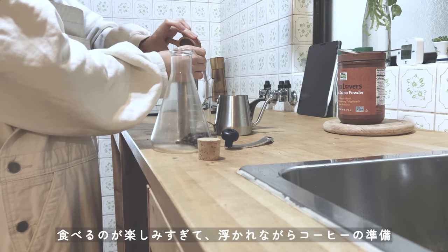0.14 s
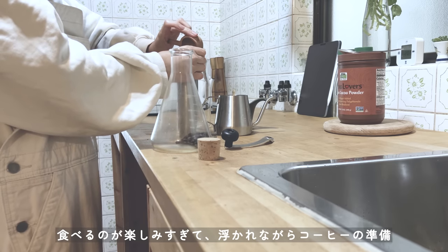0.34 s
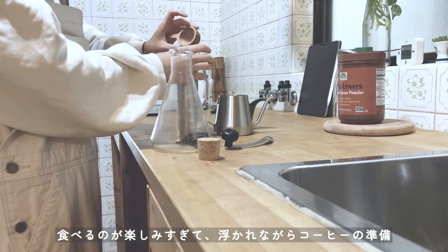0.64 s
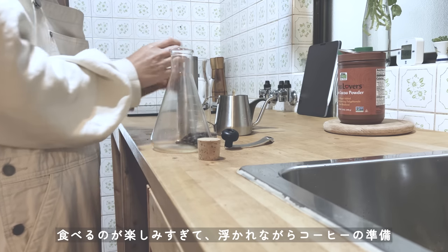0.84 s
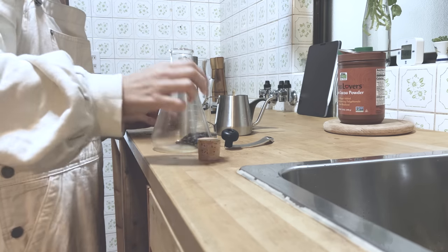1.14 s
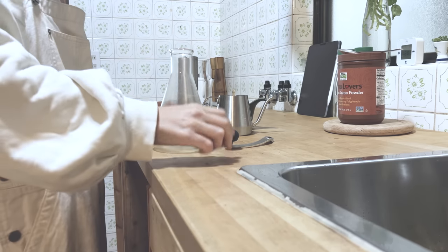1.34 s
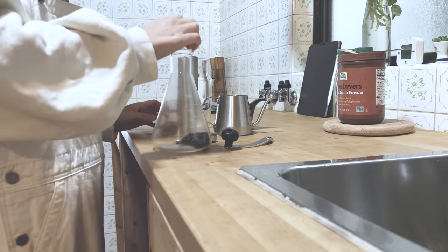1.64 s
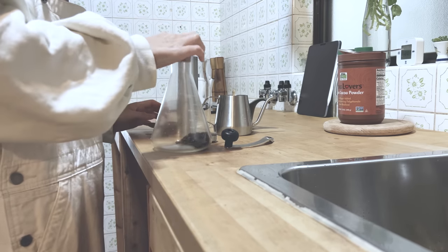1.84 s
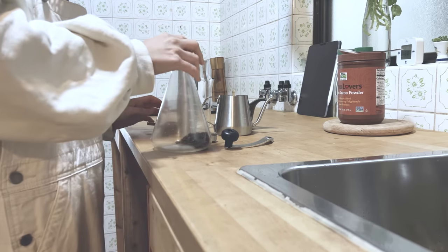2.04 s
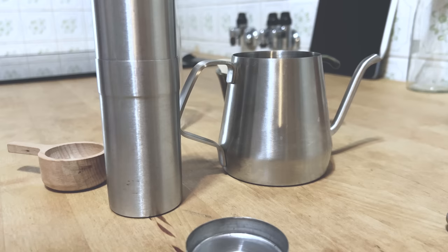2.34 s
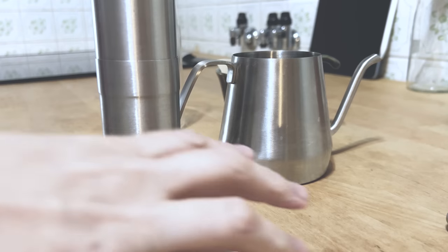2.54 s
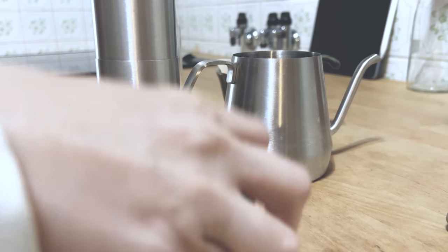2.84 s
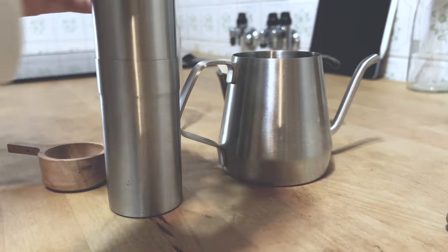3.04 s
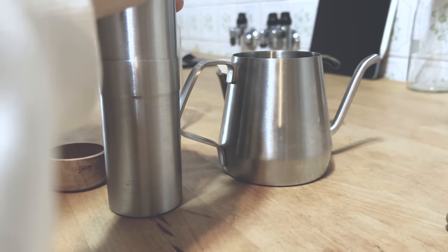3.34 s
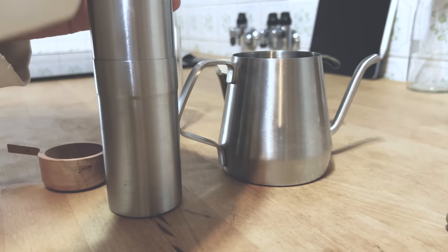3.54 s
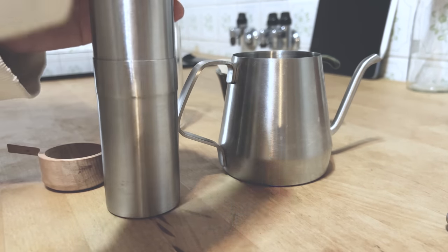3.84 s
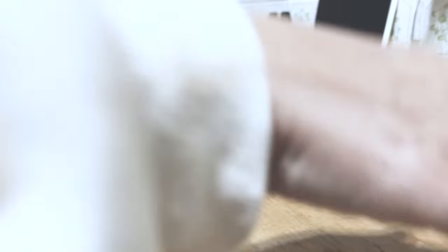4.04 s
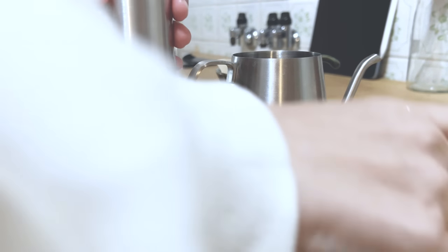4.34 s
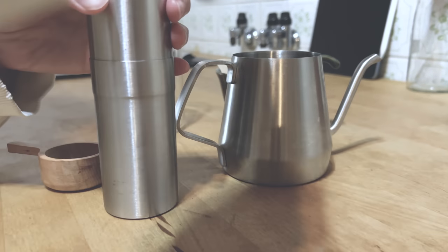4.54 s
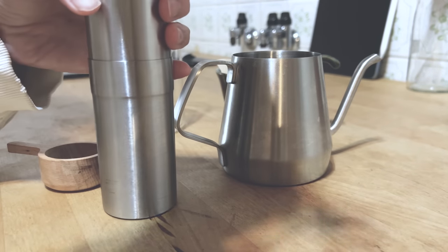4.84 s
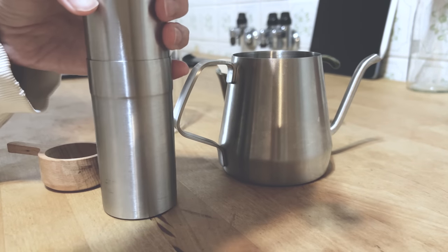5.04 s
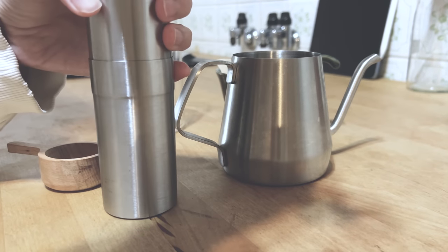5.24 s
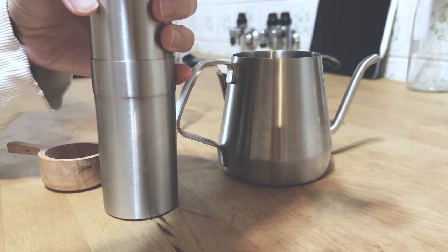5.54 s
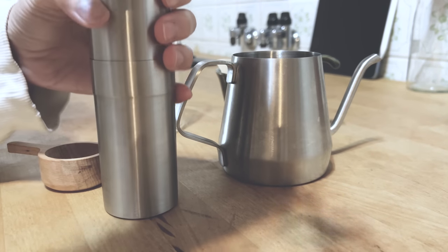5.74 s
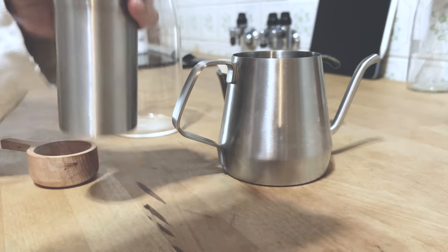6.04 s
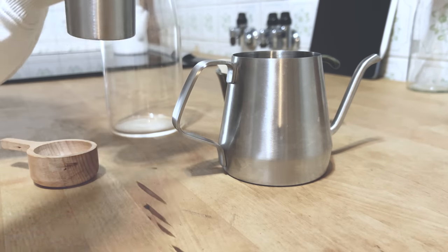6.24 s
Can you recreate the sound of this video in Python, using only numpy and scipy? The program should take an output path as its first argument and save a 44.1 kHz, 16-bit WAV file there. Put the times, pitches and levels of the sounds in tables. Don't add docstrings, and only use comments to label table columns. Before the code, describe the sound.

Coffee grounds hiss into a glass flask, a cork thuds in, then a steel hand grinder is knocked, cranked and sharply lifted off its jar.

```python
import sys
import numpy as np
from scipy import signal
from scipy.fft import rfft, irfft
from scipy.io import wavfile
from scipy.ndimage import map_coordinates

SR = 44100
rng = np.random.default_rng(int(sys.argv[2]) if len(sys.argv) > 2 else 0)


def undo_db(level):
    steps = np.asarray(level, float) / 20
    return 10 ** steps


def inscribe(sig):
    pcm = np.round(np.clip(np.atleast_2d(sig).T, -1, 1) * 32767)
    wavfile.write(sys.argv[1], SR, pcm.astype(np.int16))


N = 282240

# pitch_hz, density_db [dB per Hz]
CRACK = [(700, -10.5), (1500, -4), (3000, -7.5), (5000, -9.5), (7500, -18), (10000, -46)]
# pitch_hz, density_db [dB per Hz]
DULL = [(500, -4.5), (1200, 3), (2800, -10.5), (3800, -25), (5300, -50)]
# pitch_hz, level_db, t60_s
GRIPPED = [(2210, 1, .018), (4300, -7.5, 0.016), (4980, 2, 0.055), (5640, 2.5, 0.044), (6190, -6, 0.026),
           (8850, -13.5, 0.043)]


def unit(x):
    return x / np.sqrt(np.mean(x ** 2) + 1e-20)


def along(points, hz):
    f, v = np.transpose(points)
    return np.interp(np.log(hz + 1), np.log(f + 1), v)


def pan(pan_db):
    return undo_db([[pan_db / 2], [-pan_db / 2]])


def coloured(x, points):
    shape = undo_db(along(points, np.fft.rfftfreq(4096, 1 / SR)))
    cepstrum = irfft(np.log(shape + 1e-6))
    cepstrum[1:2048] *= 2
    cepstrum[2049:] = 0
    kernel = unit(irfft(np.exp(rfft(cepstrum)))) / 64
    return signal.fftconvolve(x, kernel[None], axes=1)[:, :x.shape[1]]


def wobble(rate):
    knots = rng.standard_normal((2, int(N * rate / SR) + 4))
    return np.array([map_coordinates(k, [np.arange(N) * rate / SR]) for k in knots])


def rush(points, alike, pan_db, grain_db, rate):
    a, b = rng.standard_normal((2, N))
    turn = np.arccos(np.clip(alike, 0, 1)) / 2
    pair = np.array([np.cos(turn) * a + np.sin(turn) * b, np.cos(turn) * a - np.sin(turn) * b])
    grains = undo_db(grain_db * wobble(rate)[0])
    return unit(coloured(pair * grains, points)) * pan(pan_db)


def levels(rows):
    s, *cols = np.transpose(rows)
    return [undo_db(np.interp(np.arange(N) / SR, s, db, left=-120, right=-120)) for db in cols]


def gestures(rows, rest_db, rise, fall):
    # start_s, level_db
    stillness = [
        (0, 2.5),
        (2.3, 3.5),
        (4.7, 2),
        (5.1, -2),
        (5.6, 0),
        (6.4, 4),
    ]
    t = np.arange(N) / SR
    swells = []
    for s, hold, db in rows:
        swells.append(undo_db(db - rise * np.maximum(s - t, 0) - fall * np.maximum(t - s - hold, 0)))
    return np.maximum(np.max(swells, axis=0), undo_db(rest_db) * levels(stillness)[0])


def ringing(modes, t, spread, blur, rise):
    hz, db, t60 = np.transpose(modes)[:, :, None]
    chance = rng.standard_normal((3, len(modes), 1))
    side = np.array([1, -1])[:, None, None]
    level = undo_db(db + 2 * chance[0] - 60 * t / t60)
    knots = rng.standard_normal((2, len(modes), 400))
    step, part = np.divmod(t * np.clip(blur * hz, 1, 1000), 1)
    before, after = [np.take_along_axis(knots, step[None].astype(int) + k, axis=2) for k in (0, 1)]
    drift = before * (1 - part) + after * part
    flutter = np.exp(-t / 0.0043) + (1 - np.exp(-t / 0.02)) * (0.26 + drift[0] + 1j * drift[1])
    phase = 2 * np.pi * hz * t + 2 * chance[2] + spread * side * chance[1]
    waves = (flutter * np.exp(1j * phase)).imag
    return (level * waves).sum(axis=1) * (1 - np.exp(-t / rise)) ** 2


def struck(contacts, modes, colour, edge_db, pan_db, crack_t60, blur, rise):
    # pitch_hz, level_db, t60_s
    counter = [(230.7, -14, 0.17), (337.7, 3.5, 0.059), (400.6, 0, 0.062), (509, 8.5, 0.025),
               (649.6, 3.5, 0.037), (724, 0, 0.038), (864.6, -13.5, 0.096), (1048.6, -5, 0.055)]
    # pitch_hz, density_db [dB per Hz]
    edge_colour = [(5000, -16.5), (7500, 14.5), (9000, 6), (13000, 10), (15700, 3), (16300, -21)]
    crack, edge, tones = np.zeros((3, 2, N + SR))
    t = np.arange(SR // 3) / SR
    for s, db, knock_db, ring_db in contacts:
        at = slice(round(s * SR), round(s * SR) + len(t))
        gain = undo_db(db) * pan(pan_db)
        noise = rng.standard_normal((2, 3, len(t)))
        shared_and_own = 0.31 * noise[:, :1] + 0.5 * noise[:, 1:]
        bursts = shared_and_own * undo_db(-60 * t / crack_t60) * (1 - np.exp(-t / rise)) ** 2
        crack[:, at] += gain * undo_db(2.5) * bursts[0]
        edge[:, at] += gain * undo_db(edge_db + 7.5) * bursts[1]
        knock_gain = undo_db(db + knock_db + 1.5) * pan(-2.4)
        tones[:, at] += knock_gain * ringing(counter, t, spread=0.25, blur=0.14, rise=rise + 0.0015)
        tones[:, at] += gain * undo_db(ring_db + 1.0) * ringing(modes, t, spread=0.82, blur=blur, rise=rise)
    return (coloured(crack, colour) + coloured(edge, edge_colour) + tones)[:, :N]


def hum():
    # pitch_hz, level_db [rms]
    partials = [(156, -64), (416, -67), (230.5, -72.5)]
    t = np.arange(N) / SR
    tones = 0
    for hz, db in partials:
        tones = tones + undo_db(db + 3 + 3 * wobble(9.07)[0]) * np.sin(2 * np.pi * hz * t)
    return tones * (t < 2.36)


def pouring():
    # start_s, level_db
    pour = [
        (0.0, -35.5),
        (0.308, -42.5),
        (0.52, -75.5),
    ]
    # pitch_hz, density_db [dB per Hz]
    grounds = [(880, -32), (2240, -4), (3600, -15), (4150, -3.5), (5790, -2.5), (11000, -3.5), (14300, -35),
               (22000, -120)]
    return levels(pour)[0] * rush(grounds, alike=0.16, pan_db=3.0, grain_db=1.5, rate=110)


def hands():
    # start_s, level_db
    weight = [(0, -50.5), (1.15, -54.5), (1.92, -45.5), (2.1, -52.5), (2.33, -55), (2.38, -74), (2.66, -67),
              (2.8, -54.5), (3.2, -59.5), (3.4, -45.5), (3.7, -50.5), (4.0, -57.5), (4.32, -47.5),
              (4.55, -55.5), (5.3, -52.5), (5.6, -44.5), (6.0, -51), (6.4, -64)]
    # start_s, hold_s, level_db
    rubs = [(0, 0.29, -55.5), (.87, 0.087, -56.5), (1.345, 0.0049, -59), (2.37, .2, -53),
            (2.77, 0.059, -53), (2.88, 0.28, -60), (3.36, 0.089, -55), (3.58, 0.03, -62), (4.05, 0.21, -61),
            (4.29, 0.045, -54), (4.5, 0.003, -62), (4.62, 0.14, -60), (4.9, 0.066, -47.5),
            (5.63, 0.062, -52), (5.87, .55, -53.5)]
    # pitch_hz, density_db [dB per Hz]
    rumble_colour = [(18, -47.5), (30, -34), (47, -3), (70, -1), (102, -5), (190, -15.5), (250, -40.5),
                     (420, -120)]
    shuffle_colour = [(76, -32), (130, -11), (233, -3), (426, -1.5), (507, -5.5), (2500, -29.5),
                      (3250, -51), (5500, -120)]
    rub_colour = [(530, -5.5), (900, -3), (1500, -5), (3540, -13), (8870, -16.5), (9800, -18),
                  (12700, -39.5), (21600, -120)]
    rumble, = levels(weight)
    shuffle = undo_db(-56) * (rumble / np.median(rumble)) ** 0.5
    rubbing = gestures(rubs, rest_db=-72.5, rise=183, fall=102)
    return (rumble * rush(rumble_colour, alike=0.89, pan_db=-3, grain_db=2.2, rate=19)
            + shuffle * rush(shuffle_colour, alike=0.41, pan_db=-1.0, grain_db=2.5, rate=31)
            + rubbing * rush(rub_colour, alike=0.037, pan_db=5, grain_db=0.5, rate=180))


def sleeves():
    # start_s, hold_s, level_db
    swishes = [(0, .3, -37), (.8, 0.19, -67), (1.345, 0.0077, -59), (1.68, 0.04, -59.5), (2.4, 0.56, -67.5),
               (3.33, .02, -53), (3.58, 0.045, -64.5), (3.83, 0.047, -57), (4.07, 0.18, -68),
               (4.22, .17, -63), (4.62, .01, -58), (5.44, 0.036, -68), (5.67, .1, -52.5),
               (5.75, 0.045, -48), (5.9, .4, -66), (6.38, .03, -59)]
    # pitch_hz, density_db [dB per Hz]
    cloth = [(3000, -26), (5000, -15.5), (9500, -12.5), (10200, -8), (11100, -13), (11600, -3.5),
             (15500, -6), (16100, -41)]
    moving = gestures(swishes, rest_db=-76.5, rise=400, fall=390)
    return moving * rush(cloth, alike=0.42, pan_db=0.0, grain_db=2.0, rate=240)


def board():
    # start_s, crack_db, knock_db, ring_db
    landing = [
        (1.1975, -44, -10, -10),
        (1.2068, -24.5, -10, 1.5),
        (1.2214, -34, -12, 1),
        (1.2444, -32.5, -8, -9),
    ]
    rebound = [
        (1.2768, -19, -14, -10.5),
        (1.2837, -22.5, -12, -15),
    ]
    # pitch_hz, level_db, t60_s
    slab = [(436, -6, 0.069), (559, 1, 0.088), (740, 3, .045), (1065, 1, .08), (1378, -4, .08),
            (1790, 2, 0.085), (2116, 1, .04), (2353, -14, .06), (2750, -14, 0.055), (3200, -17, 0.041)]
    # pitch_hz, density_db [dB per Hz]
    open_colour = [(500, -3), (1200, 5), (2200, 1), (3300, -10), (3800, -28), (5000, -33), (5600, -47)]
    firm = [(500, -4), (1500, 4), (4000, -10), (5000, -26), (7500, -42)]
    wood_and_glass = [(1095, 3, 0.058), (1780, -1, .05), (4040, -16, 0.18)]  # Hz, dB, t60 s
    return (struck(landing, slab, open_colour, edge_db=-56, pan_db=0.0, crack_t60=0.1,
                   blur=0.135, rise=0.0007)
            + struck(rebound, wood_and_glass, firm, edge_db=-47, pan_db=1.0, crack_t60=0.04,
                     blur=0.0228, rise=0.00038))


def clear_rings():
    # start_s, pitch_hz, peak_db, t60_s, pan_db [left over right]
    free = [(5.9398, 4030, -13, .085, 6), (4.2255, 13200, -41, .09, 1.5), (4.2215, 5300, -27, .03, 3),
            (4.2275, 5600, -26, .025, 3), (4.2275, 4000, -29, .02, 3), (4.8432, 9000, -19, .07, -3),
            (4.8432, 1045, -19, .07, 1.5), (4.8432, 400, -14, .07, -3), (4.8436, 560, -16, .06, -3),
            (5.4905, 330, -11, .12, -3), (5.4905, 460, -15, .09, -3), (5.4905, 1060, -22, .07, 1.5),
            (4.2388, 480, -18, .05, -3), (5.8992, 5300, -18, .025, 7), (5.886, 380, -23, .05, -1.5),
            (3.6135, 3830, -30, .016, 3), (1.6995, 1130, -30, .025, -3), (1.702, 520, -28, .07, -3),
            (1.208, 1810, -30, .09, -1.5), (4.9592, 6400, -29, .025, 3), (5.669, 520, -25, .05, -1.5),
            (6.2785, 620, -28, .035, 5), (6.248, 2760, -40, .22, 4)]
    tones, t = np.zeros((2, N + SR)), np.arange(SR // 4) / SR
    for s, hz, db, t60, pan_db in free:
        tone = undo_db(db - 60 * t / t60) * (1 - np.exp(-t / 0.0006)) * np.sin(2 * np.pi * hz * t)
        tones[:, round(s * SR):][:, :len(t)] += tone * pan(pan_db)
    return tones[:, :N]


def leaning():
    # start_s, peak_db, pitch_hz
    bumps = [(1.241, -30, 96), (1.308, -30.5, 95.5), (1.737, -34, 66.6), (1.839, -31.5, 112),
             (1.825, -35, 201), (1.891, -40.5, 191), (1.941, -41, 130), (3.268, -31, 97), (3.64, -40, 91),
             (4.237, -32, 70.5), (4.859, -33.5, 64), (5.139, -29, 103), (5.499, -29, 102.6),
             (5.673, -24.5, 88.4), (5.716, -28.5, 48), (5.885, -36.5, 103)]
    low, t = np.zeros(N + SR), np.arange(SR // 4) / SR
    for s, db, hz in bumps:
        swell = (1 - np.exp(-t / 0.0038)) * undo_db(-60 * t / 0.18)
        low[round(s * SR):][:len(t)] += undo_db(db + 2) * swell * np.sin(2 * np.pi * hz * t)
    return low[:N] * undo_db([[-1], [1]])


def scoop():
    # start_s, crack_db, knock_db, ring_db
    clatter = [
        (1.3353, -41.5, -6, -22),
        (2.1301, -50, -5, -33),
        (3.2485, -23.5, 1, -11.5),
        (3.2599, -25, -32, -10.5),
        (3.2737, -25, -4, -8.5),
        (3.2867, -26, 2.5, -20),
        (3.2964, -25, 1, -34),
        (3.3033, -24, -5, -12),
        (3.4523, -41, -10, -2.5),
        (3.6135, -32.5, -1.5, -12),
    ]
    # pitch_hz, level_db, t60_s
    bowl = [(1010, 13, 0.039), (3830, 0.5, 0.047), (5050, -27, 0.2)]
    return struck(clatter, bowl, CRACK, edge_db=-5.5, pan_db=1.5, crack_t60=0.041, blur=0.049, rise=0.00064)


def cork_in_flask():
    # start_s, crack_db, knock_db, ring_db
    cork = [
        (1.6634, -51.5, 18, -15),
        (1.699, -45, 19, 3),
        (1.806, -52.5, 18.5, -9),
        (1.821, -55.5, 24.5, -25),
        (1.915, -63, 23, -25),
    ]
    neck = [
        (2.077, -57, 0, 25),
    ]
    # pitch_hz, level_db, t60_s
    flask = [(1184, 18.5, 0.025), (1364, 15.5, 0.037), (2250, -1.5, 0.16), (6590, -1.5, 0.15),
             (11700, -21, 0.14), (13540, -27, 0.22)]
    return (struck(cork, flask, DULL, edge_db=-5, pan_db=0, crack_t60=0.021, blur=0.026, rise=0.00094)
            + struck(neck, [(2210, 0, 0.062)], DULL, edge_db=-20, pan_db=-2.0, crack_t60=.01,
                     blur=0.0067, rise=0.0014))


def lid():
    # start_s, crack_db, knock_db, ring_db
    slides = [
        (2.672, -48.5, 16, 8.5),
        (2.70, -50.5, 11, 9),
        (2.915, -69, 2, 18),
    ]
    # pitch_hz, level_db, t60_s
    cap = [(3120, -1, .1), (4680, -7, .1), (7100, -2, .12), (10300, -2, .1), (11900, 0, .12),
           (13550, -2, .13)]
    return (struck(slides[:2], cap, CRACK, edge_db=-9.5, pan_db=2.0, crack_t60=0.59, blur=0.06, rise=0.009)
            + struck(slides[2:], [(4390, -13.0, 0.33)], DULL, edge_db=-29, pan_db=9, crack_t60=0.11,
                     blur=0.0106, rise=.01))


def tone_swell():
    # pitch_hz, peak_db
    song = [(380, -36), (590, -41), (1020, -45), (3120, -55), (4680, -58)]
    middle_s, half_length_s = 2.72, .019
    t = np.arange(N) / SR
    swell = np.exp(-.5 * ((t - middle_s) / half_length_s) ** 2)
    return swell * sum(undo_db(db + 2.5 * wobble(70)) * np.sin(2 * np.pi * hz * t) for hz, db in song)


def small_steel():
    # start_s, crack_db, knock_db, ring_db, pitch_hz, t60_s
    flicks = [
        (3.4523, -62, -20, 3, 5150, 0.29),
        (3.614, -46, -17, -8, 3830, 0.015),
    ]
    # start_s, crack_db, knock_db, ring_db
    ticks = [
        (4.1962, -30.5, 3, -0.5),
        (4.6103, -60, -20, 4),
        (4.6567, -48.5, -20, 4.5),
        (4.745, -43, -25, 2),
        (4.757, -51, -24.5, -1),
        (5.8523, -47.5, -21, -8),
        (5.8923, -21.5, -26, -9),
    ]
    pings = [
        (4.2255, -45.5, -20, 8),
        (4.286, -62, -20, 6),
    ]
    shaft = [(13200, -2, .07), (9200, -1, .08)]  # Hz, dB, t60 s
    steel = (struck(ticks, GRIPPED, CRACK, edge_db=-16, pan_db=4.5, crack_t60=0.011, blur=0.13, rise=0.00057)
             + struck(pings, shaft, CRACK, edge_db=-8, pan_db=-1.0, crack_t60=.01, blur=0.0101, rise=.0015))
    for s, db, knock_db, ring_db, hz, t60 in flicks:
        steel += struck([(s, db, knock_db, ring_db)], [(hz, 0, t60)], CRACK, edge_db=-20, pan_db=5.0,
                        crack_t60=0.0092, blur=0.028, rise=.0006)
    return steel


def wood_taps():
    # start_s, crack_db, knock_db, ring_db
    taps = [
        (3.6464, -50.5, 12.5, -16),
        (4.2387, -27, 1.5, -23),
        (4.3829, -43.5, -12, 4),
        (4.402, -52, -17, -8),
        (5.1598, -47.5, 14, -12),
        (5.237, -47.5, 6, -2),
        (5.462, -35, 8, -0.5),
        (5.6538, -30.5, 5, -12.5),
        (5.668, -28.5, 2.5, -20),
        (5.6735, -43.5, 19, -20),
    ]
    # pitch_hz, level_db, t60_s
    plank = [(754, 5.5, 0.052), (1070, -1, 0.06), (1380, -12, 0.032), (1880, -3, 0.087), (2380, -27, 0.081),
             (3030, -22, 0.092)]
    return struck(taps, plank, DULL, edge_db=-30, pan_db=2.5, crack_t60=0.045, blur=0.11, rise=0.00024)


def grinder_shell():
    # start_s, crack_db, knock_db, ring_db
    pushes = [
        (4.186, -38.5, 19, -12),
        (5.882, -41.5, 22.5, 3),
    ]
    knocks = [
        (4.2208, -33, 6.5, 6),
        (4.7364, -40, -23, -3),
        (5.4888, -18, 3, -7),
        (5.5193, -32, -16, -13),
        (5.5272, -26, -24, -4),
        (5.899, -12.5, -21, -12.5),
        (5.9226, -21, -32, -15),
    ]
    muffled = [
        (4.2276, -22.5, -2.5, -20),
        (4.6828, -41, -20, 3),
        (4.7209, -27.5, -24, -10),
        (4.7697, -42, -37, 1),
        (5.5004, -10, -1.5, -22),
        (5.5328, -24, -9, -24),
    ]
    grazes = [
        (4.32, -46.5, 18.5, -11),
        (4.595, -63, -6, 9),
        (5.479, -20, 6.5, -5),
    ]
    # pitch_hz, level_db, t60_s
    tube = [(4260, -7, 0.029), (4640, -9, 0.061), (4980, 7, 0.058), (5680, 5, 0.049), (6130, -2, 0.041),
            (6740, -23, 0.094), (8700, -6.5, 0.054), (14100, -24, 0.0588)]
    blur = .17
    return (struck(pushes, tube, CRACK, edge_db=-16, pan_db=-2, crack_t60=0.15, blur=blur, rise=0.0057)
            + struck(knocks, tube, CRACK, edge_db=-6.0, pan_db=4.0, crack_t60=0.018, blur=blur, rise=0.00048)
            + struck(muffled, GRIPPED, CRACK, edge_db=-31, pan_db=7, crack_t60=0.023, blur=blur, rise=0.0011)
            + struck(grazes, tube, CRACK, edge_db=-16.0, pan_db=10.5, crack_t60=0.044, blur=blur,
                     rise=0.0035))


def crank():
    # start_s, crack_db, knock_db, ring_db
    strikes = [
        (4.8429, -17.5, 3, -0.8),
        (4.959, -25, -7, -6),
        (5.0319, -23.5, 4.5, -10.5),
    ]
    lead_ins = [
        (4.834, -50.5, 19.6, -17),
        (5.025, -38, 6, -9),
    ]
    # pitch_hz, level_db, t60_s
    handle = [(1048, 9, 0.056), (4260, -19, 0.1), (6390, 4, 0.02), (7220, -7, 0.035), (8930, 0, 0.05)]
    return (struck(strikes[:1], handle, CRACK, edge_db=-8.0, pan_db=4.0, crack_t60=0.031,
                   blur=.1, rise=0.00018)
            + struck(strikes[1:] + lead_ins, handle, CRACK, edge_db=-20.0, pan_db=6.0, crack_t60=0.033,
                     blur=0.163, rise=0.0006))


def crank_rattle():
    # start_s, level_db
    rattle = [
        (4.85, -48),
        (4.88, -38),
        (4.92, -31),
        (4.955, -36),
        (5.02, -58),
    ]
    # pitch_hz, density_db [dB per Hz]
    loose = [(500, -19), (900, -10.5), (1050, -5), (1300, -16.5), (4000, -32), (11000, -41)]
    return levels(rattle)[0] * rush(loose, alike=0.85, pan_db=0.5, grain_db=2.5, rate=59)


def lifting():
    # start_s, crack_db, knock_db, ring_db
    jar = [
        (5.9393, -2, -33.5, -2.5),
        (5.9727, -26, -12, -4),
    ]
    clacks = [
        (5.9905, -18.5, -22, -4),
        (5.9965, -9, -31, -1.5),
        (6.01, -34, -17, 7),
        (6.029, -36, -24, 7),
        (6.039, -37, -22, 7),
    ]
    # pitch_hz, level_db, t60_s
    glass = [(1924, -5, 0.025), (3010, -2, 0.022), (4030, -12, 0.03), (4500, -4, 0.015)]
    burr = [(1958, -4, 0.032), (4710, 4, 0.065), (5150, 3, 0.055), (5590, 3, 0.053), (6360, -11, 0.053),
            (8357, -9.5, .04), (8900, -6.5, 0.053)]
    return (struck(jar, glass, CRACK, edge_db=-24.0, pan_db=2, crack_t60=0.016, blur=0.0049, rise=0.00012)
            + struck(clacks, burr, CRACK, edge_db=-4, pan_db=8.5, crack_t60=0.013, blur=0.081, rise=0.00047))


def thread_scrape():
    # start_s, level_db
    unscrew = [
        (6.22, -48),
        (6.26, -39),
        (6.31, -40),
        (6.36, -36),
        (6.4, -40),
    ]
    # pitch_hz, density_db [dB per Hz]
    scrape = [(250, -24), (550, 2), (800, -6.5), (1300, -10), (3000, -9.5), (6000, -40)]
    return levels(unscrew)[0] * rush(scrape, alike=0.9, pan_db=4.5, grain_db=5.5, rate=130)


def thread_catching():
    # start_s, crack_db
    catches = [(6.2276, -32), (6.2477, -29.5), (6.2785, -31), (6.2968, -36), (6.317, -42.5), (6.339, -29),
               (6.346, -25), (6.3596, -20), (6.3638, -23.5), (6.3668, -16), (6.3944, -15)]
    # pitch_hz, level_db, t60_s
    thread = [(602, 5.5, 0.016), (806, 4, 0.043), (1016, -4, 0.035), (2750, -8, 0.14), (3630, 1.5, 0.017)]
    contacts = [(s, db, -17.5, -3.5) for s, db in catches]
    return struck(contacts, thread, CRACK, edge_db=-16.5, pan_db=4.0, crack_t60=0.021,
                  blur=0.012, rise=0.00065)


def room(x):
    # pitch_hz, t60_s
    kitchen = [(150, 0.53), (1000, 0.35), (4000, 0.39), (9000, 0.32), (11000, 0.1)]
    wet, step = np.zeros((2, N + 2 * SR)), SR // 4
    for start in range(0, N, step):
        hz, t, z = signal.stft(rng.standard_normal((2, SR // 2)), SR, nperseg=256)
        decay = undo_db(-60 * t / along(kitchen, hz)[:, None])
        tail = signal.istft(z * decay, SR, nperseg=256)[1]
        tail = tail / np.linalg.norm(tail[0])
        answer = signal.fftconvolve(x[None, start:start + step], tail, axes=1)
        wet[:, start + 200:][:, :answer.shape[1]] += answer
    return wet[:, :N]


def scene():
    near = (scoop() + cork_in_flask() + lid() + small_steel() + wood_taps() + grinder_shell() + crank()
            + thread_catching())
    far, close = board(), lifting()
    echo = room((undo_db(-9.5) * near + undo_db(-0.7) * far + undo_db(-14) * close).mean(axis=0))
    friction = hands() + pouring() + crank_rattle() + thread_scrape()
    mix = near + far + close + echo + friction + leaning() + hum() + clear_rings() + tone_swell()
    right_lag = 10
    return np.array([mix[0], np.roll(mix[1], right_lag)]) + sleeves()


def low_pass(x):
    return signal.sosfilt(signal.butter(12, 16450, fs=SR, output="sos"), x)


def record(dry):
    # pitch_hz, level_db
    treble = [(7200, 1), (7650, -8.5), (8100, 0), (9700, -3.5), (10400, -11), (11000, -14), (11500, -1)]
    hz = np.fft.rfftfreq(N, 1 / SR)
    heard = irfft(rfft(dry) * undo_db(along(treble, hz)), N)
    return low_pass(np.clip(heard, -1, 1))


dry = scene()
out = record(dry)
inscribe(out)
```